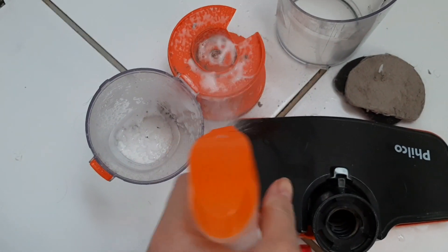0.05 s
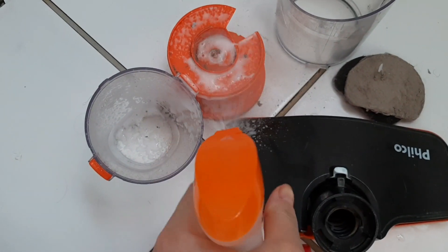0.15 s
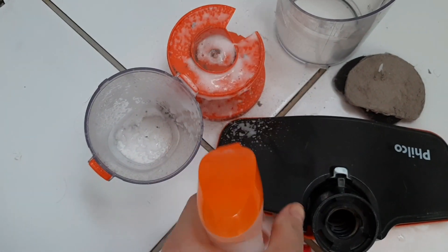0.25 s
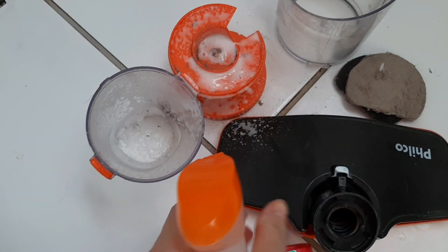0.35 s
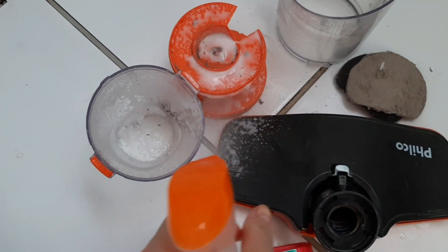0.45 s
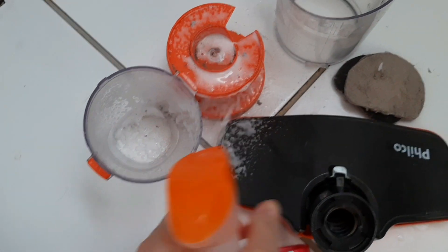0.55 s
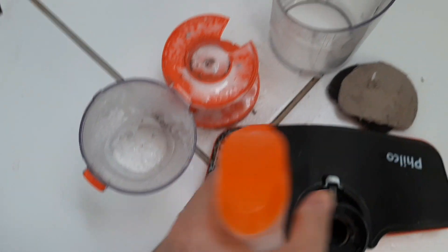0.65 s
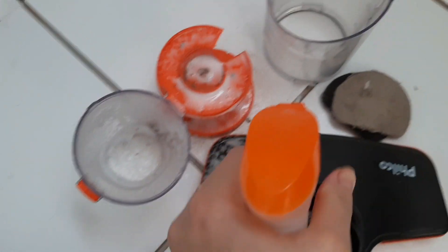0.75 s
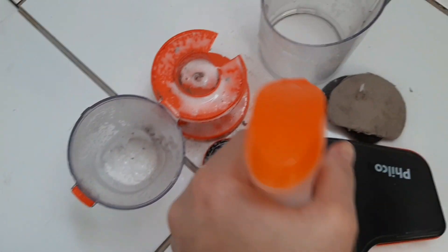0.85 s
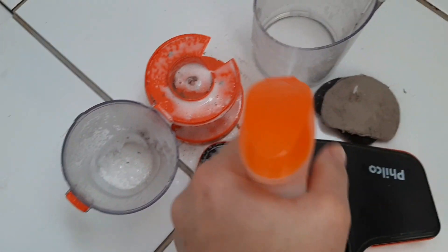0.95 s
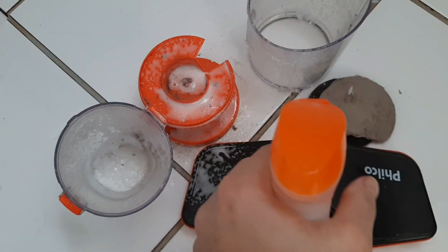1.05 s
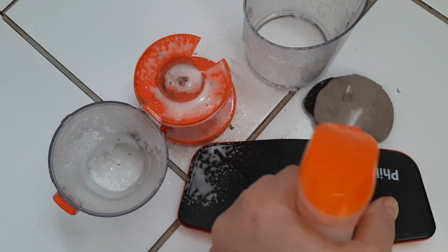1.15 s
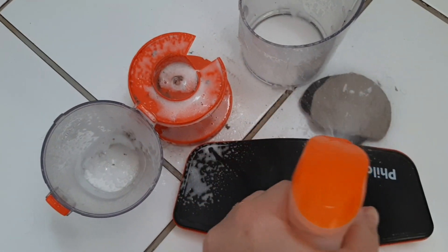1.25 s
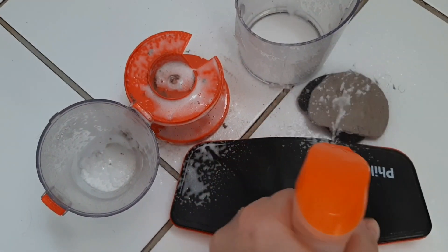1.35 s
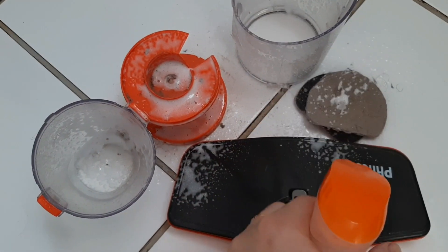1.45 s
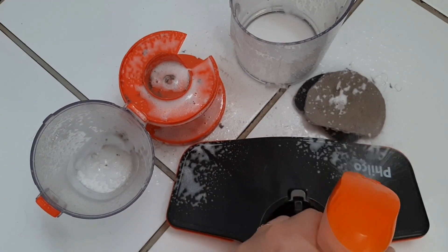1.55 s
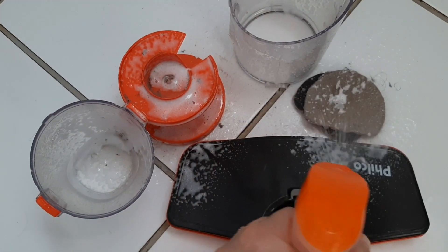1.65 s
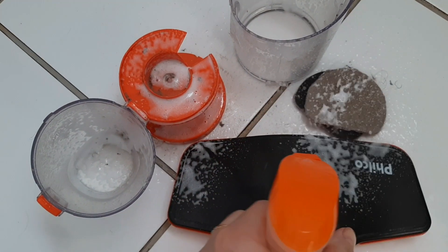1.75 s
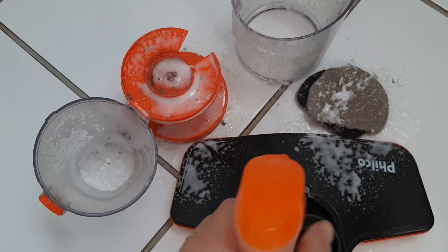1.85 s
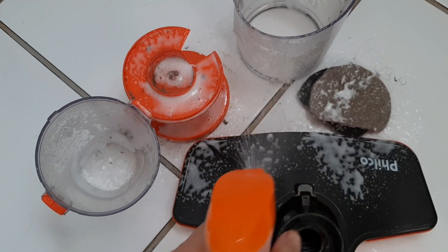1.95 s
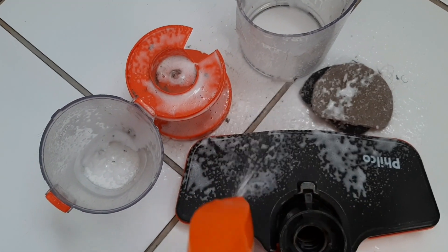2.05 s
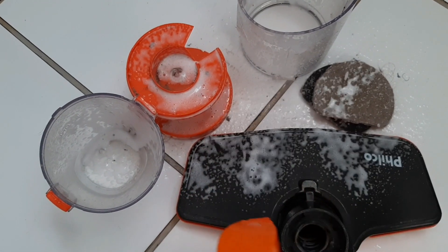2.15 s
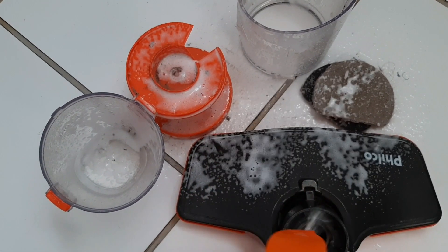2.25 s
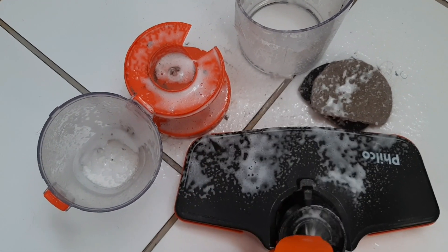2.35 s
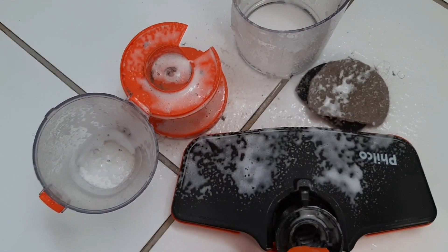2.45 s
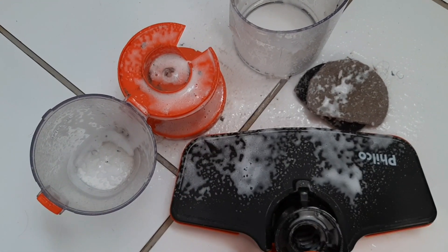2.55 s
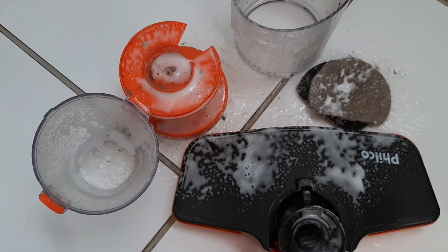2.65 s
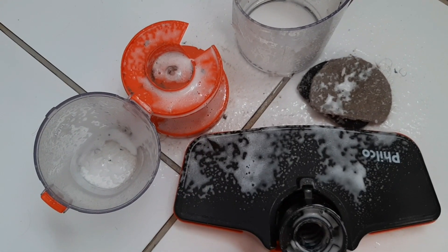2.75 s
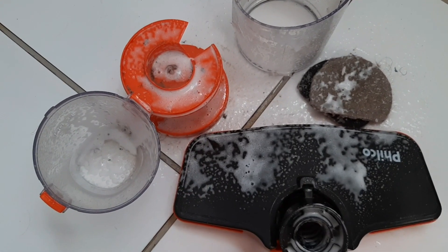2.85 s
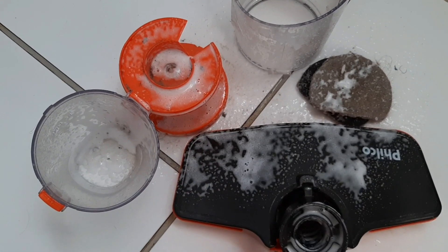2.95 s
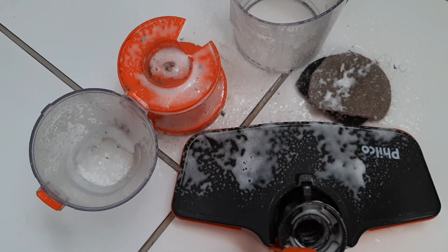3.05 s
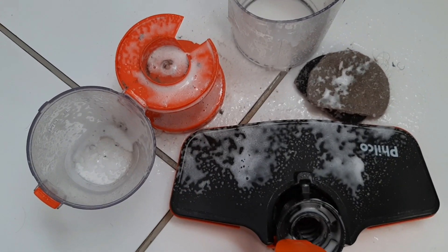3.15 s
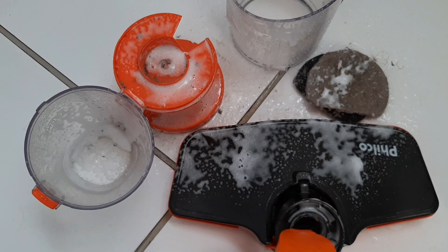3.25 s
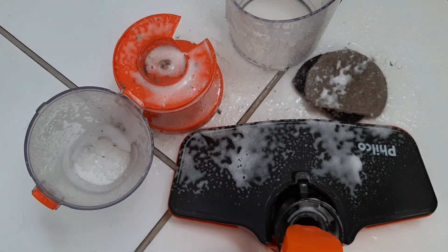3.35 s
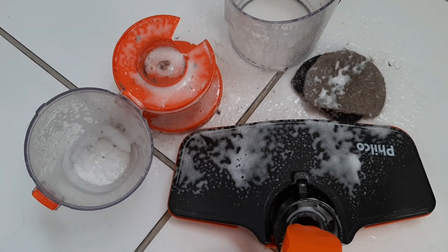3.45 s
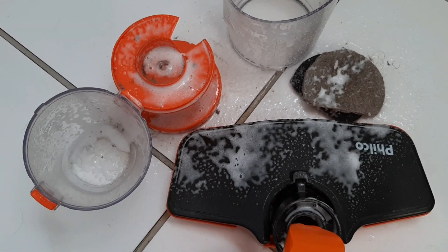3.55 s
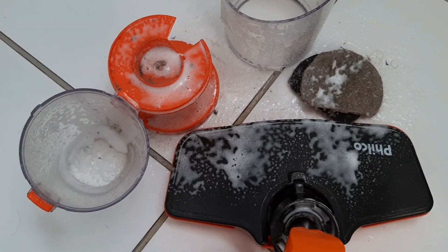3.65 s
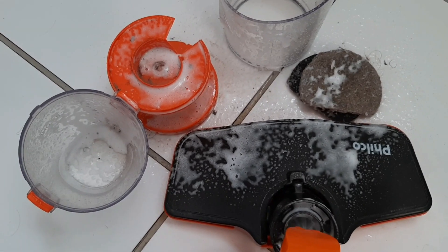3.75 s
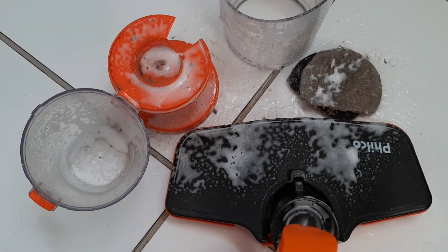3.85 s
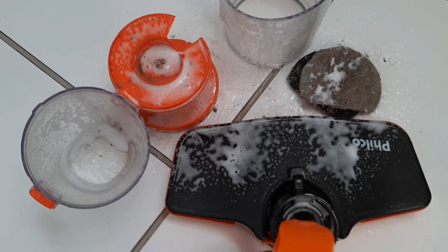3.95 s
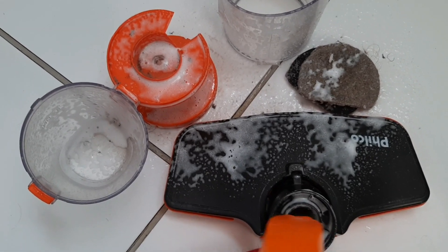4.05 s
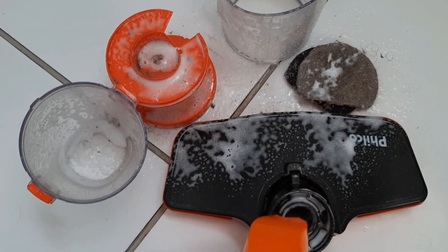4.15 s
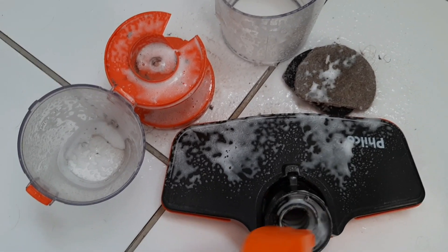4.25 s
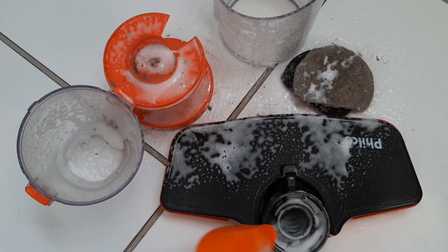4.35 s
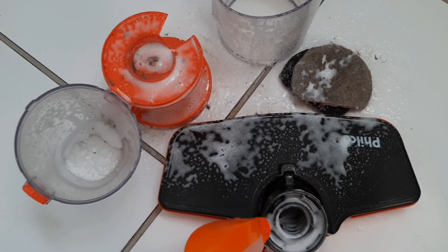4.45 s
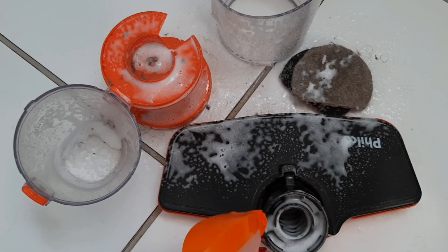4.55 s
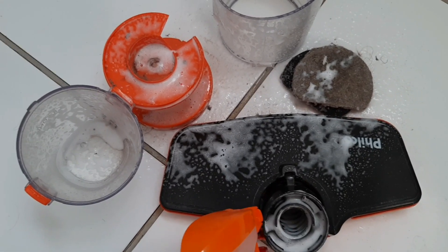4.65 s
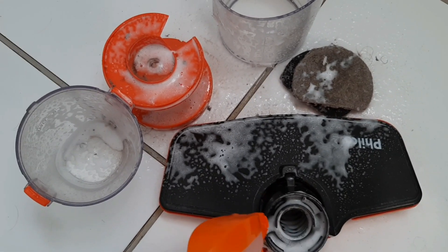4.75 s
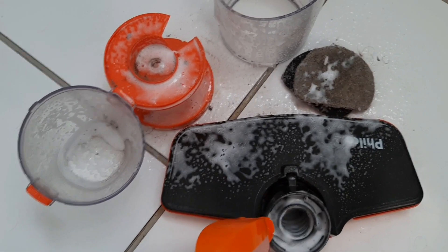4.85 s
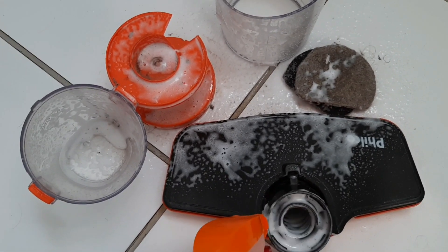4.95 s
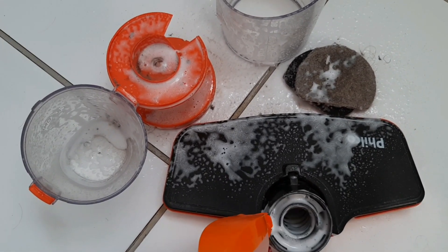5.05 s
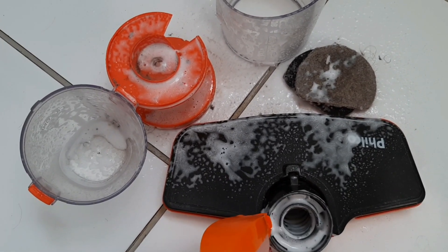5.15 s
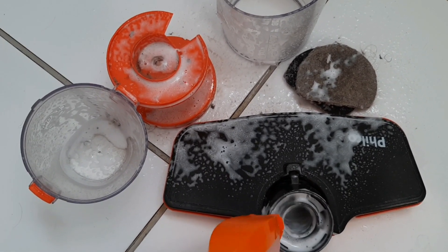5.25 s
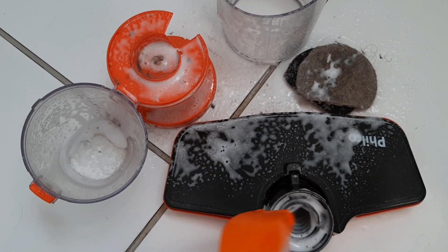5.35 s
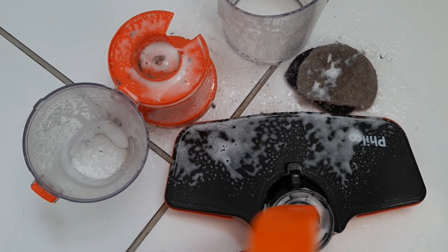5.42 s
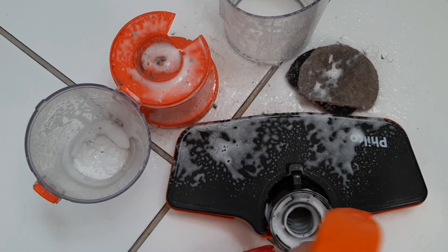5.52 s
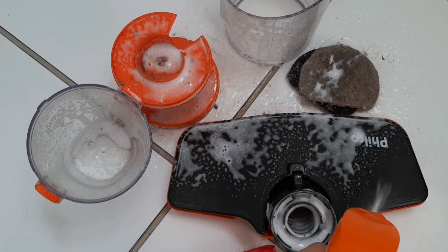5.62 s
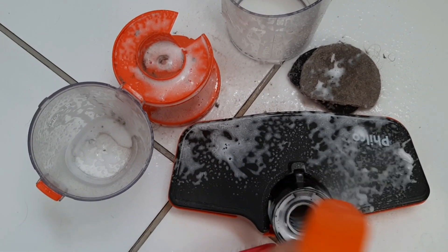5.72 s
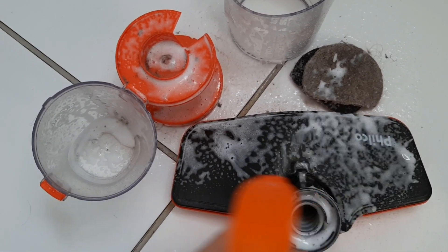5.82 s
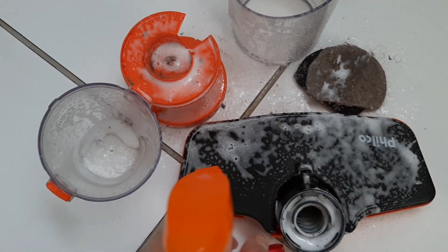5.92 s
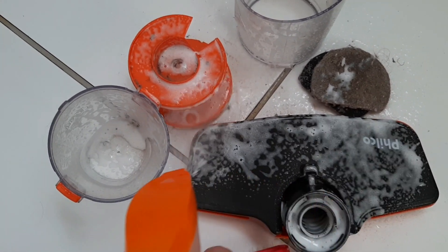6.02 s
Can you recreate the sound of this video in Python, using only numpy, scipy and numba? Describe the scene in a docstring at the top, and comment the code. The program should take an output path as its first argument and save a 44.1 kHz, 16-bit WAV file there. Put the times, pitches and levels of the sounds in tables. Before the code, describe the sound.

Sharp airy spray bursts, each opening abruptly and dying quickly, patter softly on hollow plastic. They repeat briskly, then stop for roughly a second, leaving faint room air, a thin quiet whine and a very soft rustle. Spraying returns with wider, then quicker gaps, joined by low handling thumps, floor shuffle and short trigger squeaks. Close stereo microphone indoors, hard floor, brief reflections.

```python
"""Trigger sprayer over plastic parts

A trigger bottle squirts foam onto plastic parts on a tiled floor: shaped noise hisses at each pull.
Landing spray is noise rung through resonances; the trigger creaks and a soft rustle comes and goes.
Knocks are decaying modes with a click and a rattle; a low shuffle is noise in the same modes.
Room air, a faint narrow whine and a deep rumble lie underneath.
"""
import sys
import numpy as np
from scipy import signal
from scipy.fft import rfft, irfft
from scipy.io import wavfile
from scipy.ndimage import uniform_filter1d, map_coordinates
from numba import njit

SR = 44100
rng = np.random.default_rng(int(sys.argv[2]) if len(sys.argv) > 2 else 0)


def log_audio(samples):
    """Write samples as a 16-bit WAV file to the path given in sys.argv[1]."""
    # one column per channel
    frames = np.atleast_2d(samples).T
    # limit to full scale, then quantise
    limited = np.clip(frames, -1, 1)
    pcm = np.round(limited * 32767).astype(np.int16)
    wavfile.write(sys.argv[1], SR, pcm)


N = 268128  # samples

# trigger pulls, hiss and landing spray: open_s, seep_before_s, stroke_s, pressure_build_s, hiss_db,
# brightness_db, dribble_after_db, landing_db, drip_after_db, ringing_hz, ringing_after_hz, lift_5_9khz_db
PULLS = [(-.32, 0.0092, 0.12, 0.036, -14, 3, -83, -44, -75.5, 1280, 1280, -2),
         (0.053, 0.0086, 0.17, 0.051, -30, 4.5, -82, -53, -78.5, 1294, 1225, 5),
         (0.423, 0.021, 0.16, 0.029, -29, 0.5, -72, -53.5, -70.5, 1260, 1510, 2.5),
         (0.799, 0.047, .21, 0.028, -30, 1.5, -80, -52.5, -67.5, 1193, 1610, 1),
         (1.194, 0.014, .18, 0.052, -29, 1, -84, -53.5, -70.5, 1421, 1420, 1.4),
         (1.551, 0.023, 0.18, 0.076, -28, 1.5, -106, -53, -76.5, 1288, 1293, 0.8),
         (1.926, 0.023, .2, 0.057, -30, 2, -93.5, -51, -64, 1324, 1240, 1.4),
         (2.298, 0.0032, 0.17, 0.027, -31, -0.5, -82, -54.5, -72.5, 1170, 1162, -0.1),
         (2.687, 0.0061, 0.17, 0.046, -30.5, 1, -77, -53, -73.5, 1324, 1365, 0.5),
         (3.703, 0.031, 0.22, 0.048, -31, 3.5, -94.5, -46.5, -84.5, 1465, 1535, 1.5),
         (4.252, 0.028, 0.22, 0.068, -30, 3, -88, -46.5, -74, 1380, 1150, 0.5),
         (4.84, 0.027, 0.19, 0.057, -30.5, 1.5, -85.5, -53, -97, 1397, 1448, 0.5),
         (5.256, 0.0089, 0.13, 0.031, -31.5, 2, -90, -44.5, -96, 1552, 1135, 2.5),
         (5.662, 0.0084, 0.17, 0.054, -31, 4.5, -90, -46.5, -70, 1300, 1430, 4),
         (6.021, 0.0049, 0.23, 0.025, -32, 2, -62, -51, -74, 1136, 1190, 3)]
# mist spectrum: freq_hz, relative_density_db
JET_SPECTRUM = [(880, -29), (1500, -12.5), (1830, -28.5), (2040, -14.5), (2700, -12.5), (3350, -8),
                (3600, -4.5), (4640, -2), (5070, -4.5), (5830, -0.5), (7100, -5), (8000, -3.5), (8660, -6),
                (12000, -1.5), (15100, -3), (16000, -5.5)]
# late spits of mist: start_s, length_s, level_db
SPITS = [(4.59, .075, -57)]
# mist echoes off nearby floor and cups: mean_delay_s, left_db, right_db
ECHOES = [(.0011, -16.5, -13.5), (.0023, -21.5, -24), (.0041, -9, -9)]
# mist, left over right: freq_hz, difference_db
LEFT_TILT = [(1500, -1), (2800, 1.5), (4400, 2), (8100, 2), (15000, 3.5)]
# mist bands that flicker alone: centre_hz, width_hz, depth_db
PATCHES = [(2180, 390, -2.5), (3100, 1100, -1), (3580, 170, -4), (4680, 460, -1), (5700, 1200, -8),
           (7040, 920, -10.5)]
# hollow-part resonances: centre_hz, width_hz, relative_db
HOLLOWS = [(1295, 180, -2), (1611, 30, 8), (2350, 1620, 3.5), (760, 620, -11)]
# trigger creaks: start_s, length_s, pitch_hz, level_db, tone_over_rub_db
SQUEAKS = [(0.163, 0.072, 896, -59, -9), (1.46, 0.03, 1286, -52, -8), (1.593, 0.11, 755, -63, 6),
           (1.995, 0.068, 690, -61.5, 2), (2.1, 0.098, 770, -49, -15), (2.158, 0.055, 663, -37, -3),
           (2.165, 0.061, 1095, -46, -14), (2.308, 0.016, 1329, -56, -4), (2.413, 0.015, 1170, -47.5, 0),
           (2.991, 0.014, 1286, -57, 2), (3.227, 0.21, 1068, -75.5, -3), (4.6, 0.039, 1048, -54, -19),
           (4.725, 0.068, 1018, -57, 0), (5.68, 0.033, 948, -46.5, 3), (5.704, 0.013, 900, -41, -2),
           (5.728, 0.018, 942, -49, -7), (5.699, 0.013, 1236, -54, 0), (5.772, 0.02, 1150, -46.5, -1)]
# soft rustle: start_s, length_s, level_db
RUSTLE = [(0.634, 0.28, -53.5), (2.918, 0.32, -67), (3.18, 0.25, -80.5), (4.068, 0.24, -75.5),
          (4.698, 0.13, -90)]
# rustle resonances: centre_hz, width_hz, relative_db
RUSTLE_MODES = [(1930, 390, 5), (3440, 650, 0), (3900, 340, 8), (5020, 560, 3), (5800, 900, -8),
                (4360, 12000, -3.5)]
# knocks: start_s, thud_peak_db, pitch_hz, click_over_thud_db, boom_over_thud_db, rise_s, ring_t60_s
KNOCKS = [(0.18, -52, 406, 21, -25, 0.0051, 0.25), (0.803, -55, 344, 10, -34, 0.0021, 0.47),
          (1.004, -52, 270, -9, -26, 0.0069, 0.32), (2.156, -30.5, 293, 6.5, -6.5, 0.0019, 0.16),
          (2.184, -39, 286, 3.5, -5, 0.0017, 0.15), (2.223, -45, 287, 0, -30, 0.0018, 0.15),
          (2.447, -41.5, 290, 7, -18, 0.0021, 0.17), (2.49, -36, 290, -1.5, -39.5, 0.0022, 0.21),
          (2.522, -41, 280, -15, -15, 0.01, 0.089), (2.992, -57, 166.5, -17, -14, 0.0028, 0.16),
          (4.181, -54.5, 350, -8, -31, 0.0044, 0.12), (4.343, -42, 374, 4, -14.5, 0.0015, 0.2),
          (4.505, -40, 396, -7.5, -42, 0.0034, 0.26), (4.567, -44, 354, -4, -35, 0.0084, 0.38),
          (4.597, -54, 298, -10, -23, 0.006, 0.27), (4.613, -43.5, 224, -15, -35, 0.0048, 0.36),
          (4.714, -36, 306, -4, -32, 0.01, 0.11), (4.736, -38, 306, -25, -41, 0.0055, 0.22),
          (4.853, -49.5, 246, -5, -23, 0.0076, 0.092), (5.311, -46, 239, -15, -21, 0.0091, 0.29),
          (5.332, -42, 380, -20, -29, 0.0062, 0.25), (5.353, -39.5, 390, -20, -26, 0.005, 0.21),
          (5.474, -39, 320, -22, -19, 0.0065, 0.1), (5.495, -40.5, 229, -22, -18, 0.0053, 0.16),
          (5.766, -36.5, 309.3, -13, -32, 0.0063, 0.23), (5.779, -33, 358, -22, -15, 0.003, 0.21),
          (5.831, -49.5, 399, -2, -3, 0.002, 0.24), (5.905, -46.5, 225, -8, -12.5, 0.0031, 0.21)]
# low modes shared by knocks and shuffle: centre_hz, width_hz, relative_db
BODY_MODES = [(163.8, 23, -2.5), (226.5, 85, 0), (288, 9.2, 3.5), (356.5, 23, 2.5), (386, 8.8, 1.5),
              (401.5, 120, 0), (515, 97, -7.5)]
# loose plastic shaken by the blows: freq_hz, relative_density_db
RATTLE_SPECTRUM = [(150, -15.5), (300, 0.5), (550, -6.5), (800, -13.5), (1100, -1), (1600, -31.5),
                   (2600, -38.5), (5000, -74)]
# low shuffle through the floor: time_s, level_db, ringing_hz
SHUFFLE = [(0, -81.5, 272.6), (.22, -68, 341), (.51, -86, 300), (.83, -61.5, 324), (.93, -68, 308),
           (1.1, -73.5, 285), (1.52, -71.5, 334), (1.66, -87, 276), (2.0, -78.5, 309), (2.35, -69.5, 281.5),
           (2.86, -72, 312.5), (3.08, -66, 307), (3.2, -85, 265.4), (3.62, -92.5, 298.5), (3.8, -62, 330),
           (4.0, -82.5, 255), (4.3, -71, 306), (4.54, -52, 346), (4.62, -57, 268.6), (4.71, -63, 311),
           (4.93, -59.5, 265.4), (5.08, -64.5, 317), (5.3, -100, 325.5), (5.42, -55.5, 328),
           (5.55, -70.5, 281), (5.78, -106, 335), (5.94, -59, 270), (6.08, -57.5, 309)]
# room air spectrum: freq_hz, relative_density_db
ROOM_SPECTRUM = [(25, -12), (75, -13), (150, -13.5), (300, -18), (700, -24), (1200, -21), (2200, -38.5),
                 (4000, -35), (6500, -38), (8700, -51), (11000, -34.5), (14500, -33.5)]
# narrow whine: time_s, level_db
WHINE = [(0, -79), (2.2, -81), (2.3, -70), (2.9, -83), (3.0, -69), (3.13, -67), (3.3, -69), (3.5, -70.5),
         (3.58, -74.5), (3.68, -79.5), (4.1, -75), (6.08, -82)]
# thin lines inside the whine: freq_hz, amplitude_db
WHINE_LINES = [(1438, -7), (1503, -1), (1553, -3)]
# deep rumble: time_s, level_db
RUMBLE = [(0.0, -105), (0.13, -81), (0.83, -80.5), (0.9, -68), (1.2, -83), (1.3, -64), (1.47, -76),
          (2.12, -79), (2.18, -59), (2.35, -81), (2.47, -71.5), (3.25, -85), (4.66, -73.5), (5.16, -89.5),
          (5.52, -70.5), (5.65, -100), (5.82, -47), (6.08, -68)]
# treble dip of the microphone port: centre_hz, width_hz, share_removed_db
PORT_DIP = (8580, 530, -6)

CONTROL_STEP = 32  # samples between control values
KNEE_S, HISS_FALL_DB_PER_S, DRIBBLE_FADE_DB_PER_S = 0.013, 313.5, 48.5
SWELL_DB, SWELL_S, SAG_DB_PER_S, DULLEST_DB = 11, 0.052, 66, -4.5  # top band of the hiss
OPEN_DB = -16  # strength as the valve opens
SEEP_RISE_DB, SEEP_IN_S = 16, 0.003
SNAP_DB, SNAP_S = 9.5, 0.0074  # the valve's last jump
LAND_BUILD_S, LAND_FALL_DB_PER_S, DRIP_FADE_DB_PER_S = 0.05, 176.5, 45
SETTLED_S = 0.35  # dribble and drip reach their table levels this long after opening
LEFT_LAG_S, KNOCK_LAG_S = 0.00021, 0.00018
ROOM_T60_S, ROOM_DB, RATTLE_DB = 0.087, -79, -13
TOP_HZ = 15750


def undb(db):
    """Decibels to amplitude."""
    return 10 ** (np.asarray(db) / 20)


def level(x, db):
    """Scale to an RMS level."""
    return x * undb(db) / np.sqrt(np.mean(x ** 2))


def curves(rows):
    """Columns of (time_s, value, ..) rows, one value per sample."""
    time_s, *columns = np.transpose(rows)
    return [np.interp(np.arange(N) / SR, time_s, column) for column in columns]


def smooth(control):
    """Interpolate a slow control to one value per sample."""
    return np.interp(np.arange(N), np.arange(0, N, CONTROL_STEP), control)


@njit
def svf(x, hz, width_hz):
    """State-variable band-pass with a moving centre, gain 1 there."""
    y, band, low = np.empty(len(x)), 0., 0.
    for i in range(len(x)):
        g, k = np.tan(np.pi * hz[i] / SR), width_hz / hz[i]
        v = (band + g * (x[i] - low)) / (1 + g * (g + k))
        band, low, y[i] = 2 * v - band, low + 2 * g * v, k * v
    return y


def ring(x, modes):
    """Both channels through parallel resonances of alternating polarity."""
    out = np.zeros((2, N))
    for k, (hz, width_hz, db) in enumerate(modes):
        centre_hz = np.full(N, 1. * hz)
        out += (-1) ** k * undb(db) * np.array([svf(c, centre_hz, 1. * width_hz) for c in x])
    return out


def colour(x, points):
    """Shape the spectrum by (freq_hz, gain_db) points."""
    hz, db = np.transpose(points)
    log_hz = np.log(np.fft.rfftfreq(N, 1 / SR) + 1)
    return irfft(rfft(x) * undb(np.interp(log_hz, np.log(hz), db)), N)


def walk(rate_hz):
    """Random levels held 1 / rate_hz and slewed twice; spread 1."""
    k = int(SR / rate_hz)
    held = np.repeat(rng.standard_normal(N // k + 1), k)
    return level(uniform_filter1d(uniform_filter1d(held, k), k)[:N], 0)


def ports(alike):
    """Noise at two microphones: a shared part, late on the left, and a part of their own."""
    shared, alike = rng.standard_normal(N), np.clip(alike, 0, 1)
    both = np.array([np.roll(shared, int(LEFT_LAG_S * SR)), shared])
    return np.sqrt(alike) * both + np.sqrt(1 - alike) * rng.standard_normal((2, N))


def strokes(build_s, fall_db_per_s, after_db, fade_db_per_s):
    """Gain of every pull: seep, valve opens, pressure builds, drops at stroke end; a remnant fades."""
    open_s, seep_s, stroke_s = np.transpose(PULLS)[:3, :, None]
    u_s = np.arange(0, N, CONTROL_STEP) / SR - open_s
    since_open_s = np.maximum(u_s, 0)
    before_s = np.minimum(u_s, 0)
    rise = 1 - (1 - undb(OPEN_DB)) * np.exp(-since_open_s / build_s)
    fall_db = -fall_db_per_s * KNEE_S * np.logaddexp(0, (u_s - stroke_s) / KNEE_S)
    seep_db = SEEP_RISE_DB * before_s / seep_s - SNAP_DB
    shut_db = np.maximum(seep_db, SNAP_DB * before_s / SNAP_S)
    seep_in = np.clip((u_s + seep_s) / SEEP_IN_S, 0, 1) ** 2
    shape = seep_in * rise * undb(shut_db + fall_db)
    remnant = undb(after_db - fade_db_per_s * np.maximum(u_s - SETTLED_S, -SETTLED_S))
    return since_open_s, shape + (u_s > stroke_s) * remnant


def echo(x, delay_s):
    """A copy about delay_s late; the path drifts as the bottle moves."""
    at = np.arange(N) - delay_s * SR * (1 + 0.12 * walk(2))
    return np.array([map_coordinates(c, [at], order=3) for c in x])


def mist_noise():
    """Turbulent jet torn into droplets: spiky noise with echoes and bands that flicker alone."""
    spike_db = 2.5 * np.minimum(rng.exponential(size=N), 4)
    spikes = undb(spike_db * (rng.random(N) < .1))
    mist = ports(0.28) * spikes * undb(1.1 * walk(500))
    mist = mist + sum(undb([[left_db], [right_db]]) * echo(mist, s) for s, left_db, right_db in ECHOES)
    mist = level(colour(mist, JET_SPECTRUM), 0)
    left = colour(mist[0], [(hz, db / 2) for hz, db in LEFT_TILT])
    right = colour(mist[1], [(hz, -db / 2) for hz, db in LEFT_TILT])
    mist = np.array([left, right])
    return mist + sum(np.clip(walk(25), -2, 2) * ring(mist, [patch]) / 2 for patch in PATCHES)


def nozzle():
    """Mist gated by the pulls; the top band swells, then sags through each stroke."""
    build_s, hiss_db, bright_db, dribble_db = np.transpose(PULLS)[3:7, :, None]
    lift_db = np.transpose(PULLS)[-1, :, None]
    u_s, shape = strokes(build_s, HISS_FALL_DB_PER_S, dribble_db - hiss_db, DRIBBLE_FADE_DB_PER_S)
    gain = undb(hiss_db) * shape
    swell_db = SWELL_DB * (1 - np.exp(-u_s / SWELL_S))
    bright_db = np.maximum(bright_db + swell_db - SAG_DB_PER_S * u_s, DULLEST_DB)
    t_s = np.arange(N) / SR
    late = sum(undb(db) * np.sin(np.pi * np.clip((t_s - start_s) / length_s, 0, 1)) ** 2
               for start_s, length_s, db in SPITS)
    mist = mist_noise()
    edge = colour(mist, [(3800, -38.5), (5200, -6.0), (8200, 6), (9500, -22.5)])
    top = colour(mist, [(8000, -27.5), (10000, 0.0)])
    hiss = (smooth(gain.sum(axis=0)) + late) * mist
    hiss = hiss + smooth((gain * (undb(lift_db) - 1)).sum(axis=0)) * edge
    return hiss + smooth((gain * (undb(bright_db) - 1)).sum(axis=0)) * top


def splash():
    """Drops patter into hollow resonances; one more resonance shifts in pitch during each pull."""
    land_db, drip_db, early_hz, late_hz = np.transpose(PULLS)[7:11]
    after_db = (drip_db - land_db)[:, None]
    gain = undb(land_db) @ strokes(LAND_BUILD_S, LAND_FALL_DB_PER_S, after_db, DRIP_FADE_DB_PER_S)[1]
    pitch_rows = []
    for pull, early, late in zip(PULLS, early_hz, late_hz):
        pitch_rows += [(pull[0] + 0.17, early), (pull[0] + 0.22, late)]
    hz = curves(pitch_rows)[0]
    drops = ports(0.18) * undb(1.54 * walk(150))
    nearest = np.array([svf(svf(c, hz, 280.8), hz, 280.8) for c in drops])
    return level(ring(drops, HOLLOWS) + undb(2.5) * nearest, 0.76) * smooth(gain)


def squeaks():
    """Short rings as the lever rubs: narrow noise mixed with a wavering sine."""
    hz, gain, clear, t_s = np.full(N, 1000.), np.zeros(N), np.zeros(N), np.arange(N) / SR
    for start_s, length_s, pitch_hz, db, clear_db in SQUEAKS:
        on = (t_s > start_s) & (t_s < start_s + length_s)
        hz[t_s > start_s] = pitch_hz
        gain[on] = undb(db) * np.sin(np.pi * ((t_s[on] - start_s) / length_s) ** 0.58)
        clear[on] = undb(clear_db)
    noise = ports(0.28) * undb(1.7 * walk(80))
    main = np.array([svf(svf(c, hz, 170.0), hz, 170.0) for c in noise])
    upper = np.array([svf(svf(c, 1.33 * hz, 400.0), hz, 700.0) for c in noise])
    rub = level(main + undb(-9.0) * upper, 0)
    tone = np.sqrt(2) * np.sin(2 * np.pi * np.cumsum(hz * (1 + 0.019 * walk(60))) / SR)
    tone = np.array([np.roll(tone, int(KNOCK_LAG_S * SR)), tone])
    return gain * (rub + clear * tone) / np.sqrt(1 + clear ** 2) * undb([[0.8], [-0.8]])


def rustle():
    """Soft noise in a few resonances, swelling and fading."""
    t_s = np.arange(N) / SR
    gain = sum(undb(db) * np.sin(np.pi * np.clip((t_s - start_s) / length_s, 0, 1) ** 0.94) ** 2
               for start_s, length_s, db in RUSTLE)
    # each mode filters its own noise twice
    air = sum(ring(ring(ports(0.28), [mode]), [(*mode[:2], 0)]) for mode in RUSTLE_MODES)
    return level(colour(air, [(6200, -1), (7500, -8), (8700, -15.5)]), 0) * gain * undb([[1.5], [-1.5]])


def knocks():
    """Each blow shakes the low modes, loudest near its pitch, with a click, panel boom and rattle."""
    out, shaken, t_s = np.zeros(N), np.zeros(N), np.arange(int(.4 * SR)) / SR
    turn = 2 * np.pi * t_s
    phases = 2 * np.pi * rng.random((len(KNOCKS), len(BODY_MODES)))
    for (start_s, db, hz, click_db, boom_db, rise_s, t60_s), phase in zip(KNOCKS, phases):
        swing = (1 - np.exp(-(t_s / rise_s) ** 2)) * undb(-60 * t_s / t60_s)
        thud = swing * sum(undb(mode_db - 21.0 * abs(np.log2(f / hz))) * np.sin(f * turn + p)
                           for (f, _, mode_db), p in zip(BODY_MODES, phase))
        # the whole panel flexes
        boom = np.sin(165 * turn) + 0.92 * np.sin(122 * turn)
        boom = boom * (1 - np.exp(-(t_s / 0.011) ** 2)) * undb(boom_db - 60 * t_s / (1.7 * t60_s))
        click = np.sin(1100 * turn) + 0.4 * np.sin(650 * turn) + 0.6 * np.sin(1380 * turn)
        click = click * np.exp(-t_s / 0.0021) * (1 - np.exp(-t_s / (0.35 * rise_s)))
        blow = undb(db) * (thud / np.max(abs(thud)) + boom + undb(click_db) * click)
        i = int(start_s * SR)
        out[i:i + len(t_s)] += blow[:N - i]
        shaken[i:i + len(t_s)] += (undb(db) * swing)[:N - i]
    loose = colour(ports(0.63) * undb(2.3 * walk(120)), RATTLE_SPECTRUM)
    rattle = shaken * level(loose, RATTLE_DB)
    return rattle + np.array([np.roll(out, int(KNOCK_LAG_S * SR)), out]) * undb([[-1.0], [1.0]])


def shuffle():
    """Uneven rubbing that excites the low modes, one gliding mode on top."""
    db, hz = curves(SHUFFLE)
    noise = ports(0.99) * undb(1.5 * walk(37))
    gliding = np.array([svf(c, hz, 26.0) for c in noise])
    rub = ring(noise, BODY_MODES) + undb(8.0) * gliding
    return level(rub, 0) * undb(db + np.array([[-1.0], [1.0]]))


def whine():
    """Narrow noise band near 1510 Hz with thin, slightly wavering lines."""
    hz = np.full(N, 1510.)
    band = np.array([svf(svf(c, hz, 150.), hz, 150.) for c in ports(0.099)]) * undb([[1.5], [-1.5]])
    turns = np.cumsum(1 + 0.0038 * walk(12)) / SR + rng.random((len(WHINE_LINES), 2, 1))
    lines = sum(undb(db + 2.5 * walk(8.6)) * np.sin(2 * np.pi * f * turn)
                for (f, db), turn in zip(WHINE_LINES, turns))
    return level(level(band, 0) + lines, 0) * undb(curves(WHINE)[0])


def rumble():
    """Noise peaking near 72 Hz, its level wavering."""
    deep = colour(ports(0.93), [(20, -51.0), (50, -23.5), (72, 5.0), (100, -12.0), (170, -65.5)])
    return level(deep, 0) * undb(curves(RUMBLE)[0])


def room_air():
    """Steady shaped noise, partly shared by the channels."""
    return level(colour(ports(0.57), ROOM_SPECTRUM), ROOM_DB)


def reverb(x):
    """Tiled walls send back a short diffuse tail: decaying noise of unit energy."""
    t_s = np.arange(int(.4 * SR)) / SR
    tail = rng.standard_normal((2, len(t_s))) * undb(-60 * t_s / ROOM_T60_S)
    tail = tail / np.sqrt(np.sum(tail ** 2, axis=1, keepdims=True))
    return undb(-1.5) * signal.fftconvolve(x, tail, axes=1)[:, :N]


def scene():
    """Spray layers with their reverb, plus blows, shuffle and background."""
    spray = nozzle() + splash() + squeaks() + rustle()
    return spray + reverb(spray) + knocks() + shuffle() + whine() + rumble() + room_air()


def record(dry):
    """The microphone port has a narrow treble dip; a steep low-pass cuts the top."""
    low_pass = signal.ellip(14, .2, 80, TOP_HZ, fs=SR, output="sos")
    return signal.sosfilt(low_pass, dry - ring(dry, [PORT_DIP]))


dry = scene()
out = record(dry)
log_audio(out)
```